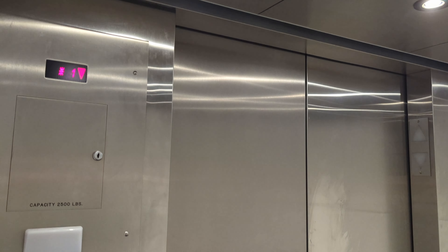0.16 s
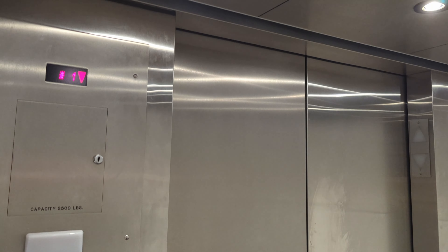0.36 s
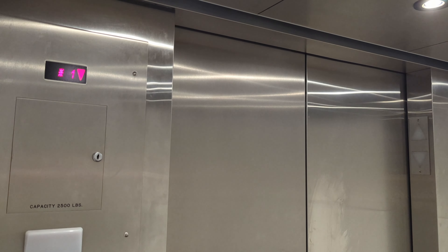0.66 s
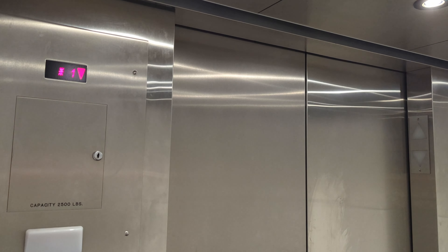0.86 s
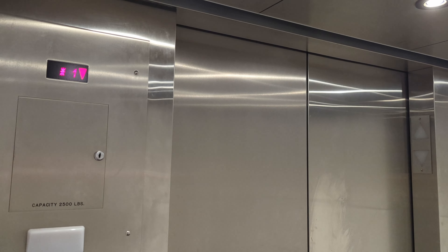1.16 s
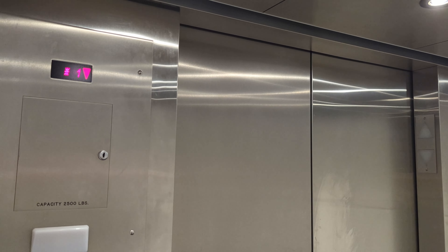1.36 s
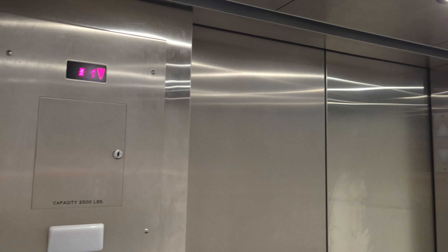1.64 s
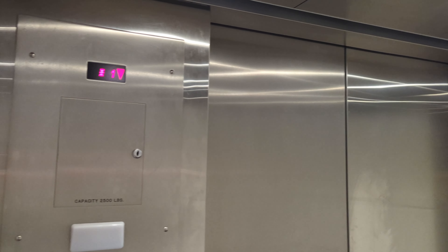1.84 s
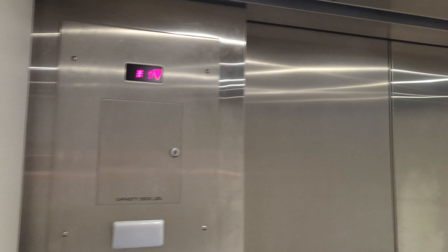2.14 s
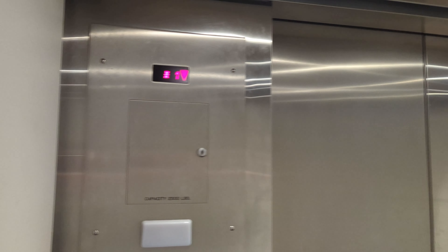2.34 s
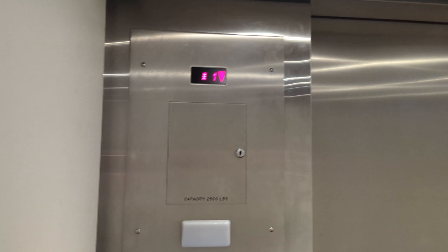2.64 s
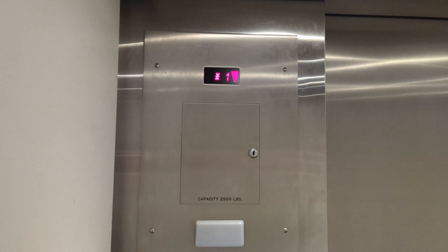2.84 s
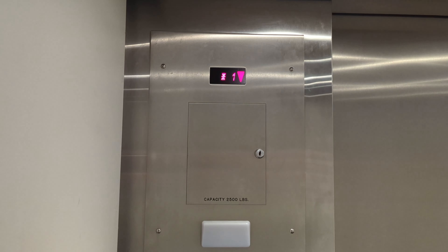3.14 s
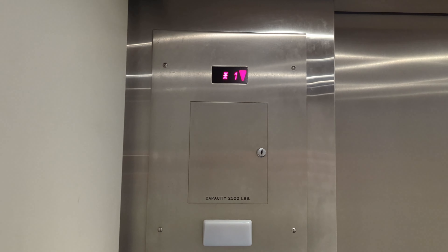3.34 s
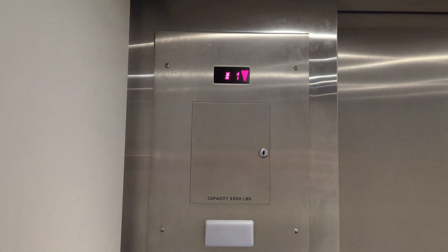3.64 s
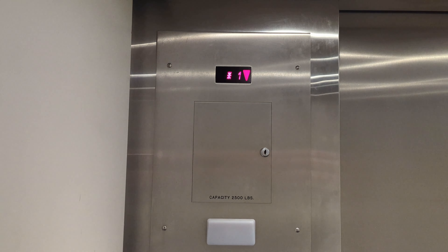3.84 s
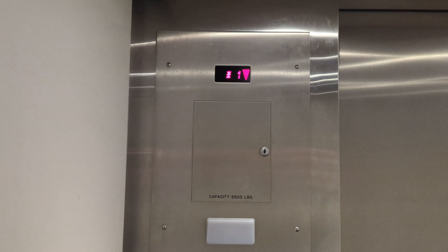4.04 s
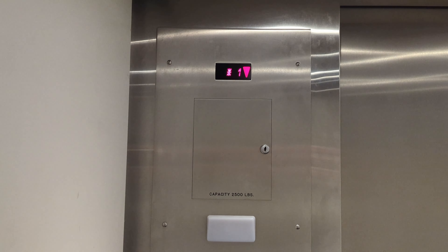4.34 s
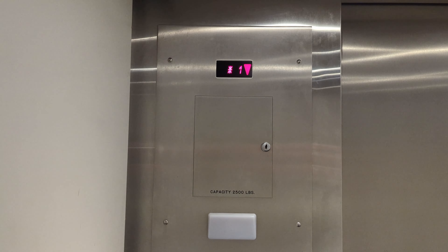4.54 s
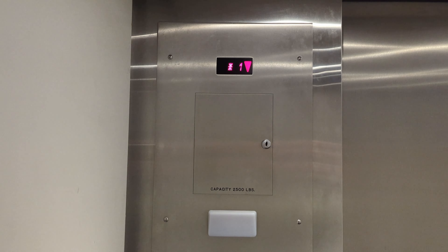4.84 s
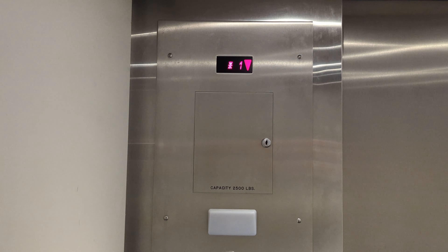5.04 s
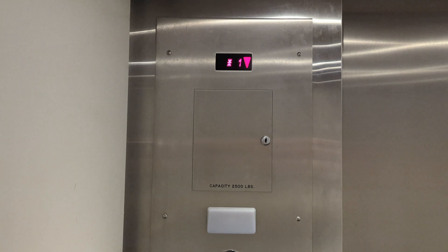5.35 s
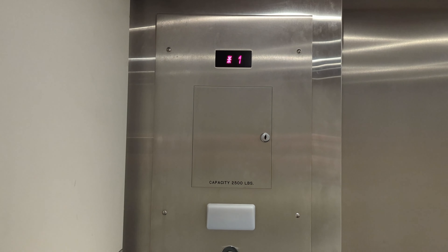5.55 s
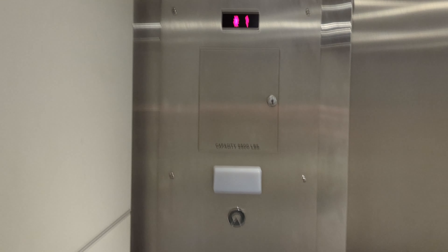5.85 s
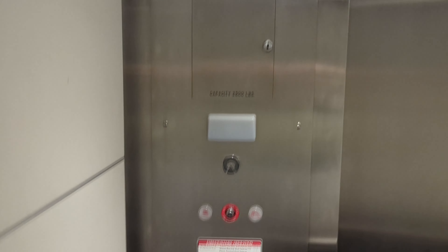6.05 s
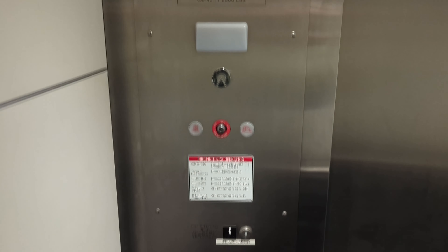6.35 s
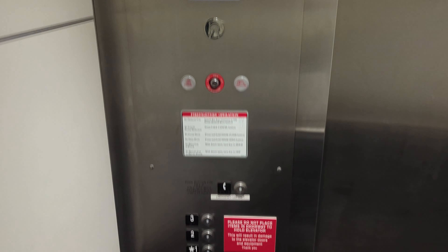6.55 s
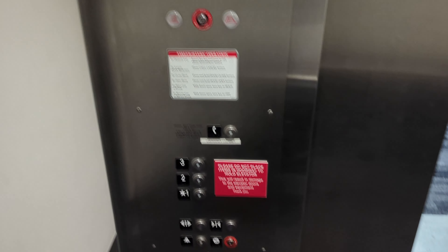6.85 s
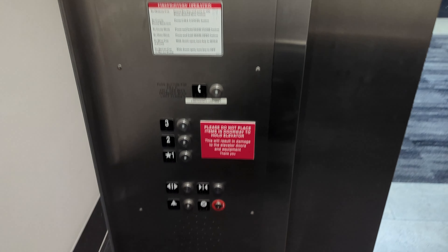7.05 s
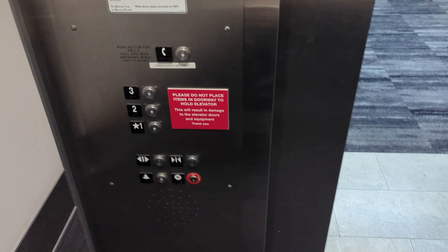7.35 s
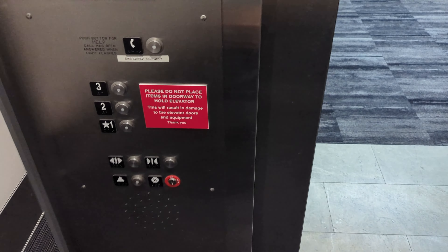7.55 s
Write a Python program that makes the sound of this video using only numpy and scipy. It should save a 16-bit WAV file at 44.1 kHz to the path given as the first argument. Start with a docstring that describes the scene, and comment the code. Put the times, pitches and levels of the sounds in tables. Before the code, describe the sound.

Close inside a steel elevator car, a valve hum dies within the first second over faint bass hum. A dull click starts a rapid, low juddering with buzzing trim that lasts several seconds. The car jolts to a stop, the lock knocks, then doors clatter loose with piercing squeaks and slide open with a groaning rumble. Stereo, short metallic reflections.

```python
"""Inside a steel lift car on a hydraulic ram: it settles, creeps down with a stick-slip judder of its
guides and jolts to a stop; the lock knocks, rollers squeak and the doors slide open over hum and faint air.
Friction, rolling and air are filtered noise; knocks and slips strike damped modes of gear and panels.
Squeaks, drones, valve and swings are fluttering tones; dense wall reflections follow the sharper sounds."""
import sys
import numpy as np
from scipy import signal
from scipy.io import wavfile
from scipy.ndimage import uniform_filter1d

SR = 44100
rng = np.random.default_rng(int(sys.argv[2]) if len(sys.argv) > 2 else 0)


def unload_audio(sound):
    """Save the sound as a 16-bit wav file, at the path given as the first command line argument."""
    columns = np.transpose(np.atleast_2d(sound))
    # keep every value between -1 and 1, then stretch to whole-number steps
    steps = np.round(np.clip(columns, -1, 1) * 32767)
    wavfile.write(sys.argv[1], SR, steps.astype(np.int16))


N = 339614
LEFT_RIGHT = np.array([[1], [-1]])  # sign of the side signal at each ear


def amp(db):
    """Level law: 20 dB is a factor of ten in amplitude."""
    return 10 ** (np.asarray(db) / 20)


def rms_one(x):
    """Normalisation to unit root-mean-square."""
    return x / np.sqrt(np.mean(x ** 2) + 1e-20)


def at_hz(points, hz):
    """Spectrum level in dB, linear in log frequency, with practically nothing outside its ends."""
    f, db = np.transpose(points)
    return np.interp(np.log(hz), np.log(f), db, left=-150, right=-150)


# Stereo width of the field. Each row: frequency in Hz, side minus mid in dB before a source's own offset.
STEREO_WIDTH = [(60, -20.5), (110, -24), (200, -11.5), (380, -7.5), (700, -2.5), (1290, 3), (2380, -0.5),
                (4400, 1), (8120, 0.5), (15000, -0.5)]


def side_gain(hz, offset_db=0):
    """Mid-side stereo: the side-to-mid ratio sets how far the two ears differ."""
    return amp(at_hz(STEREO_WIDTH, hz) + offset_db)


def drift(rate, size=None):
    """Random modulation of spread 1: noise twice through a one-pole low-pass with its corner at rate Hz."""
    size = size or N
    r = np.exp(-16 * np.pi * rate / SR)  # pole at an eighth of the sample rate
    noise = rng.standard_normal(size // 8 + 4002)
    slow = signal.lfilter([1], [1, -2 * r, r * r], noise)[4000:]  # the filter has settled
    spread = np.sqrt((1 + r * r) / (1 - r * r) ** 3)
    return np.interp(np.arange(size) / 8, np.arange(len(slow)), slow / spread)


def flutter(rate, size):
    """Complex modulation: chance in level and phase at once."""
    return drift(rate, size) + 1j * drift(rate, size)


def resonance(x, hz, width_hz):
    """Second-order resonance: a pole pair whose radius sets the bandwidth."""
    r = np.exp(-np.pi * width_hz / SR)
    return signal.lfilter([1, 0, -1], [1, -2 * r * np.cos(2 * np.pi * hz / SR), r * r], x)


def dying(s, db, t60, rise_s):
    """Exponential decay of one blow after a short rise, ended 60 dB down."""
    out, i = np.zeros(N), int(s * SR)
    t = np.arange(min(N - i, int(t60 * SR))) / SR
    out[i:i + len(t)] = amp(db - 60 * t / t60) * (1 - np.exp(-t / rise_s))
    return out


def coloured(layers, patchy_db):
    """Power addition of incoherent noise: (envelope, spectrum) layers share third-octave bands."""
    edges = 22 * 2 ** (np.arange(30) / 3)
    centres = np.minimum(np.sqrt(edges[1:] * edges[:-1]), 15000)
    gains = np.array([amp(at_hz(spectrum, centres)) * np.sqrt(centres) for _, spectrum in layers])
    powers = np.array([(env[::16] / np.linalg.norm(g)) ** 2 for (env, _), g in zip(layers, gains)])
    white, out = rng.standard_normal((2, 2, N)), np.zeros((2, N))
    for k, hz in enumerate(centres):
        band = signal.butter(2, edges[k:k + 2], "band", fs=SR, output="sos")
        mid, side = rms_one(signal.sosfilt(band, white[k % 2]))  # neighbouring bands use different noise
        level = np.sqrt(gains[:, k] ** 2 @ powers)
        level = np.interp(np.arange(N) / 16, np.arange(len(level)), level)
        level = level * amp(patchy_db * drift(8))
        out += level * (mid + side_gain(np.clip(hz, 61, 14000)) * side * LEFT_RIGHT)
    return out


def tones(rows, flutter_per_s, side_db):
    """Self-sustained oscillation of rubbed or driven steel: the rougher the contact, the faster the flutter."""
    out = np.zeros((2, N))
    for start, loudest, end, hz, db, rough, pan_db, glide_hz in rows:
        span = np.arange(max(int(start * SR), 0), min(int(end * SR), N))
        t = span / SR
        triangle = np.interp(t, [start, loudest, end], [0, 1, 0])
        swell = np.minimum(1.43 * triangle, 1) ** 1.15  # too tall a triangle, cut flat
        pitch = np.interp(t, [start, end], [hz, hz + glide_hz])
        carrier = np.exp(2j * np.pi * (np.cumsum(pitch) / SR + rng.random()))
        rate = flutter_per_s * rough ** 2
        mid, side = [(1 + rough * flutter(rate, len(t)) + 0.12 * flutter(0.045 * hz, len(t))) * carrier
                     for _ in range(2)]
        width = side_gain(np.clip(hz, 61, 14000), side_db)
        pair = (mid.real + width * side.imag * LEFT_RIGHT) * amp(pan_db / 2 * LEFT_RIGHT)
        out[:, span] += amp(db) * swell * np.sqrt(2 / (1 + 2 * rough ** 2)) * pair
    return out


def strike(times, db, hz, t60, spread_db):
    """Impulse response of one mode: uneven blows, whose soft contact excites nothing far above it."""
    clicks = np.zeros((2, N)) + 1e-18
    uneven = spread_db * rng.standard_normal((len(times), 2)).T
    clicks[:, (np.array(times) * SR).astype(int)] = amp(db + uneven)
    r, w = amp(-60 / (t60 * SR)), 2 * np.pi * hz / SR
    rung = signal.lfilter([0, np.sin(w)], [1, -2 * r * np.cos(w), r * r], clicks)
    mid, side = signal.sosfilt(signal.butter(2, 1.61 * hz, fs=SR, output="sos"), rung)
    late_side = np.roll(side, int(SR / hz / 4))  # a quarter cycle apart
    return mid + side_gain(hz, -10.0) * late_side * LEFT_RIGHT


# Faint air noise. Each row: frequency in Hz, relative spectral density in dB per Hz.
AIR_SPECTRUM = [(22, -2), (50, -7.5), (91, 1), (123, -0.5), (160, -19.5), (247, -14), (320, -20),
                (400, -27.5), (554, -30), (650, -24), (800, -35), (1500, -46), (4060, -53.5), (9000, -53.5),
                (15600, -58.5)]


def air():
    """Stationary broadband noise: a constant level with a bass-heavy spectrum."""
    return np.full(N, amp(-51)), AIR_SPECTRUM


# Lines of the electrical hum. Each row: frequency in Hz, mean level in dB rms.
HUM_LINES = [(118.4, -48), (236.8, -69.5), (296, -74)]


def hum():
    """Line spectrum of the electrical gear: steady sines that waver a little in level and phase."""
    t = np.arange(N) / SR
    waver_db = .8 * drift(2)
    return sum(amp(db + waver_db) * np.sqrt(2) * np.sin(2 * np.pi * hz * t + 0.12 * drift(0.5))
               for hz, db in HUM_LINES)


# Hum of the oil valve. Each row: frequency in Hz, relative level in dB, roughness as a share.
VALVE_LINES = [(415, -49, 0.74), (453, -56, 1.04), (627, -55.5, 1.1), (769, -59, 2.7), (1070, -63, 1.2),
               (1562, -69, 0.64)]


def valve():
    """Flow-excited tones: the oil valve hums on several pitches and dies as the car settles."""
    crest_s, end_s = 0.13, 0.63
    rows = [(-.6, crest_s, end_s, *line, 0, 0) for line in VALVE_LINES]
    return tones(rows, flutter_per_s=43.4, side_db=-1.5)


# Movements of the steelwork, one list each: settling, a bump, the jolt to a stop, the lock,
# the doors breaking loose, the doors sliding.
# Each row: time in seconds, relative rumble level in dB, relative roll level in dB.
MOVEMENTS = [
    [(0.0, -29.5, -61), (.06, -40.5, -62), (.075, -42, -61), (.2, -36.5, -56), (.27, -39, -63),
     (.31, -41.5, -56.5), (.38, -35, -57.5), (.45, -45.5, -62.5), (.6, -64, -100)],
    [(2.285, -40, -71), (2.325, -41, -59), (2.43, -41, -69), (2.55, -43, -72)],
    [(5.2, -39, -99), (5.25, -38, -62), (5.265, -40, -52.5), (5.37, -33, -56.5), (5.41, -51, -60),
     (5.5, -39.5, -66.5)],
    [(5.56, -32.5, -59), (5.59, -32, -48.5), (5.68, -35, -56.5), (5.71, -37.5, -63.5), (5.81, -32.5, -56),
     (5.93, -37, -67.5), (6.07, -39.5, -63.5)],
    [(6.14, -30, -57), (6.17, -39, -58.5), (6.21, -33.5, -59), (6.24, -31, -46.5), (6.29, -31, -46),
     (6.39, -32, -47), (6.43, -28, -45), (6.5, -30.5, -45), (6.59, -43, -45), (6.69, -34.5, -54.5)],
    [(6.75, -35, -55), (6.86, -37, -59.5), (6.93, -39.5, -62), (7.16, -39.5, -56), (7.43, -37.5, -57),
     (7.5, -42, -61), (7.53, -35.5, -52.5), (7.7, -45, -56)],
]


def moving():
    """Amplitude envelopes of rumble and roll, fading to silence outside each movement."""
    t, out = np.arange(N) / SR, np.zeros((2, N))
    for rows in map(np.array, MOVEMENTS):
        corners = rows[[0, 0, -1, -1], 0] + [-.04, 0, 0, .05]
        fade = np.interp(t, corners, [0, 1, 1, 0])
        out += fade * np.array([np.interp(t, rows[:, 0], amp(db)) for db in rows.T[1:]])
    return out


# Noise of moving steelwork, low and higher. Each row: frequency in Hz, relative density in dB per Hz.
RUMBLE_SPECTRUM = [(13, -40), (22, 1.5), (91, 4), (124, -2.5), (178, -1), (219, -22.5), (345, -12),
                   (600, -25), (780, -83), (1320, -120)]
ROLL_SPECTRUM = [(180, -0.5), (300, 3.5), (367, -0.5), (477, -6.5), (778, -8.5), (1440, -9), (3920, -26),
                 (6000, -44), (7800, -77), (13200, -120)]


def motion_noise(rumble, roll):
    """Rolling noise: moving steelwork excites a low rumble and a brighter roll."""
    return [(amp(-5.0) * rumble, RUMBLE_SPECTRUM), (amp(4.5) * roll, ROLL_SPECTRUM)]


# Panels of the car. Each row: frequency in Hz, decay time T60 in seconds,
# then gains in dB for a slip, for a knock and under motion.
PANEL_MODES = [(36.2, 0.43, -12, -16, -8), (90.8, 0.19, -6, -32, -6), (117.2, 0.22, 7, -11, -15),
               (167.2, 0.16, -13, -14, -18), (183.8, 0.14, -2.5, -13, -20),
               (260.3, 0.13, -17.5, -8.5, -25.5), (1258, 0.099, -21.5, -29, -44),
               (1840, 0.15, -29.5, -43, -66), (2080, 0.1, -37.5, -47, -65)]


def panels(rumble):
    """Forced and free vibration of plates: slips and knocks strike them, motion shakes them all along."""
    slips, blows, out = np.array(GUIDE_SLIPS), np.array(GEAR_KNOCKS), np.zeros((2, N))
    for hz, t60, slip_db, knock_db, motion_db in PANEL_MODES:
        out += strike(slips[:, 0], slips[:, 1] + slip_db, hz, t60, spread_db=-0.5)
        out += strike(blows[:, 0], blows[:, 3] + knock_db, hz, t60, spread_db=5.0)
        width_hz = 3.4 / t60
        band = resonance(resonance(rng.standard_normal(N), hz, width_hz), hz, width_hz)
        out += amp(motion_db) * rumble * rms_one(band)
    return out


# Low swings of the car body. Each row: start, loudest moment and end in seconds, frequency in Hz,
# relative level in dB.
BODY_SWINGS = [(.01, 0.052, .1, 89, -34.5), (0.073, 0.136, .2, 116, -39), (0.299, 0.36, .44, 119.8, -42),
               (5.295, 5.368, 5.5, 34.2, -35.5), (5.322, 5.35, 5.42, 75, -33),
               (5.598, 5.648, 5.76, 87, -34), (6.26, 6.28, 6.335, 165, -33),
               (6.326, 6.363, 6.41, 86.5, -22.5), (6.408, 6.43, 6.5, 179, -28),
               (6.792, 6.857, 6.92, 89.3, -38), (7.33, 7.373, 7.44, 146.4, -41.5),
               (7.519, 7.539, 7.57, 268, -39), (7.535, 7.564, 7.62, 95, -45.5)]


def swings():
    """Low-order vibration of the car body: brief, slightly rough tones."""
    rough = 0.28
    return tones([(*row, rough, 0, 0) for row in BODY_SWINGS], flutter_per_s=104, side_db=-3.0)


# Bright scuffs of steel on steel. Each row: start and length in seconds, relative scrape level in dB,
# relative sizzle level in dB.
STEEL_SCUFFS = [(0.062, 0.026, -80, -85), (0.12, 0.076, -73, -76), (0.283, 0.15, -74, -77),
                (5.262, 0.01, -63, -69), (5.572, 0.008, -71, -71), (5.609, 0.018, -66.5, -64.5),
                (6.16, .05, -79, -81), (6.222, 0.05, -57, -66), (6.359, 0.048, -56.5, -54.5),
                (6.4, 0.03, -53, -61), (6.503, 0.025, -60, -61), (6.523, 0.12, -51.5, -58.5),
                (6.736, 0.033, -61, -69), (6.647, 0.84, -64.5, -77), (7.07, 0.35, -69.5, -70.5),
                (7.508, 0.014, -86, -72), (7.579, 0.03, -65.5, -72.5)]
# Noise of scrape and sizzle. Each row: frequency in Hz, relative density in dB per Hz.
SCRAPE_SPECTRUM = [(1760, -1.5), (3000, 2), (3970, -4), (4840, 4), (6170, -4), (9000, -3.5), (11700, -45),
                   (19800, -120)]
SIZZLE_SPECTRUM = [(5290, -36), (9000, 3), (11100, -16), (13900, 2.5), (15600, -33)]


def scuffs(roll):
    """Sliding friction noise: each scuff rises, holds and dies away; rolling always scrapes a little."""
    rise_share, t60_s = 0.12, 0.28
    t, power = np.arange(N) / SR, np.zeros((2, N))
    for s, length, *db in STEEL_SCUFFS:
        rise = np.clip((t - s) / (rise_share * length), 0, 1)
        fall = amp(-60 * np.clip(t - s - length, 0, 1) / t60_s)
        power += np.outer(amp(db), rise * fall) ** 2
    scrape, sizzle = np.sqrt(power)
    scrape = np.hypot(scrape, amp(-23.5) * roll)
    return [(amp(5.0) * scrape, SCRAPE_SPECTRUM), (amp(6.5) * sizzle, SIZZLE_SPECTRUM)]


# Knocks of lock and door gear. Each row: time in seconds, relative level in dB, relative treble tilt
# in dB per octave, relative thump in dB, favoured pitch in Hz.
GEAR_KNOCKS = [(0.07, -48, 0, -63.5, 2000), (1.437, -48.5, -4.5, -63, 1280), (1.472, -57.5, -10, -58, 1270),
               (2.301, -48, -10, -50, 800), (2.313, -63, -7, -44, 1850), (5.244, -50, -3, -55, 1300),
               (5.2653, -38.5, -2, -52, 1400), (5.545, -54, -1, -50, 1400),
               (5.5813, -34.5, -4.5, -47, 1503), (5.593, -41, -6, -48, 1550), (5.629, -40, -5.5, -31, 1400),
               (5.754, -68, 5, -36, 1400), (6.118, -49, -13, -28.5, 900), (6.151, -45.5, -1.5, -52, 1400),
               (6.2371, -29, 0, -41, 940), (6.251, -35, -3, -45, 1600), (6.3639, -36.5, -2, -26.5, 950),
               (6.406, -31.5, 2, -27.5, 1500), (6.424, -30, 0.5, -29, 1820), (6.441, -46, 0, -32, 1900),
               (6.527, -38, -1, -47, 1250), (6.575, -43, -7, -47, 1500), (7.165, -46, 0, -57, 1500),
               (6.753, -53, -12, -58, 1400), (7.28, -50, -5, -55, 1400), (7.513, -35.5, -6, -30, 1090)]
# Noise of a knock before its tilt. Each row: frequency in Hz, relative density in dB per Hz.
KNOCK_SPECTRUM = [(120, -40), (200, 14), (258, -4), (321, -28), (744, -10), (1850, -8.5), (3140, -23.5),
                  (12300, -50.5), (15600, -67)]


def knocks():
    """Impact noise: a dying burst whose spectrum is tilted by how hard the contact is."""
    layers = []
    for s, db, tilt, *_ in GEAR_KNOCKS:
        spectrum = [(f, d + (tilt + 4) * np.log2(f / 1500)) for f, d in KNOCK_SPECTRUM]
        layers.append((dying(s, db - 5.0, 0.29, 0.002), spectrum))
    return layers


# Modes of lock and door gear. Each row: frequency in Hz, relative level in dB, decay time T60 in seconds.
GEAR_MODES = [(488, 0, 0.13), (814, -12, 0.051), (959, -8.5, 0.057), (1094, -11.5, 0.044),
              (1208, -10.5, 0.11), (1326, -9, 0.085), (1490, -5.5, 0.038), (1649, -11, 0.083),
              (1824, -15, 0.08), (1970, -19, 0.066), (2190, -19, .07), (2594, -15, 0.098),
              (3100, -25, 0.091)]
# Clatter of each knock. Each row: nominal delay in seconds, level against the knock in dB.
REBOUNDS = [(0, 0), (.006, -4), (.013, -1), (0.021, -7), (.033, -8)]


def gear():
    """Modal ringing: knocks and rebounds excite most the modes near the pitch that each favours."""
    scatter, off_pitch_db = .2, 9.5  # share by which a delay varies; loss in dB per octave
    blows = [(row[0] + later * (1 + scatter * rng.uniform(-1.01, 1)), row[1] + less_db, row[4])
             for row in GEAR_KNOCKS for later, less_db in REBOUNDS]
    s, blow_db, near_hz = np.transpose(blows)
    out = np.zeros((2, N))
    for hz, db, t60 in GEAR_MODES:
        loss_db = off_pitch_db * np.abs(np.log2(hz / near_hz))
        out += strike(s, blow_db + db - 2.5 - loss_db, hz, t60, spread_db=2.5)
    return out


def car_walls(x):
    """Reverberation: dense reflections between steel walls, as dying noise of its own at each ear."""
    t60_s, echo_db = .2, -8
    t = np.arange(int(t60_s * SR)) / SR
    echo = rng.standard_normal((2, len(t))) * amp(-60 * t / t60_s) * (t > .003)
    echo /= np.linalg.norm(echo[0])
    return x + amp(echo_db) * signal.fftconvolve(x, echo, axes=1)[:, :N]


# Drones and faint whistles of ram and door drive. Each row: start, nominal crest and end in seconds
# (two crests lie outside their span), frequency in Hz, relative level in dB, roughness as a share.
DRIVE_DRONES = [(0.499, 1.2, 1.3, 612, -67.5, 0.3), (1.101, 1.3, 1.6, 655, -72.5, 0.43),
                (1.788, 1.83, 2.23, 2430, -75.5, 1.2), (1.8, 1.95, 2.17, 3220, -85, 1.4),
                (2.38, 2.48, 2.6, 3360, -84, .8), (2.39, 2.415, 2.44, 4260, -84, .5),
                (1.6, 4.74, 5.35, 2834, -86, 1.07), (1.401, 6.6, 5.8, 408.4, -63, 0.4),
                (5.202, 5.275, 5.47, 460, -54.5, 0.64), (5.599, 5.68, 5.78, 477, -50.5, 0.55),
                (6.067, 6.13, 6.28, 480, -51.5, 0.98), (6.13, 6.16, 6.22, 2700, -55, 3),
                (5.7, 5.9, 6.25, 178, -47.5, 0.92), (6.55, 6.75, 7.05, 110, -53, 0.62),
                (6.958, 7.09, 7.5, 91.65, -37.5, 0.36), (6.721, 5.3, 7.6, 258.6, -52.5, 0.5),
                (6.78, 6.996, 7.09, 344.5, -48.5, 0.32), (7.05, 7.15, 7.58, 361.4, -54, 0.55),
                (7.51, 7.638, 8.0, 301.3, -47.5, 0.7)]


def drones():
    """Driven oscillation: ram and door drive sound steady pitches with a rough flutter."""
    return tones([(*row, 0, 0) for row in DRIVE_DRONES], flutter_per_s=43.4, side_db=-1.5)


# Slips of the guides while the car creeps. Each row: time in seconds, relative strength in dB.
GUIDE_SLIPS = [(1.44, -42.5), (1.554, -51), (1.612, -48), (1.683, -46), (1.75, -45.5), (1.81, -47),
               (1.872, -44), (1.937, -45), (2.007, -43), (2.102, -45), (2.16, -53), (2.289, -47),
               (2.355, -48), (2.452, -48), (2.544, -46), (2.615, -44), (2.687, -43), (2.751, -44),
               (2.812, -45.5), (2.876, -45), (2.936, -46), (3.002, -43.5), (3.068, -45.5), (3.151, -45.5),
               (3.235, -47), (3.324, -46.5), (3.418, -46.5), (3.521, -44.5), (3.618, -44.5), (3.702, -45),
               (3.78, -46.5), (3.842, -44.5), (3.907, -45), (3.968, -48.5), (4.022, -45.5), (4.082, -48.5),
               (4.134, -48.5), (4.193, -48.5), (4.253, -45.5), (4.308, -46.5), (4.365, -50.5),
               (4.435, -47.5), (4.516, -46.5), (4.599, -46.5), (4.672, -47), (4.746, -48), (4.821, -47),
               (4.889, -45.5), (4.951, -48.5), (5.012, -48.5), (5.05, -48.5), (5.115, -47), (5.165, -51),
               (5.223, -46)]


def slip_rasp():
    """Stick-slip friction: every slip releases a dying rasp of uneven strength; their powers add."""
    uneven_db = -13.5 + 1 * rng.standard_normal(len(GUIDE_SLIPS))
    power = sum(dying(s, db + own_db, 0.45, 0.003) ** 2
                for (s, db), own_db in zip(GUIDE_SLIPS, uneven_db))
    return np.sqrt(power)


# Noise of the judder. Each row: frequency in Hz, relative density in dB per Hz.
JUDDER_SPECTRUM = [(25, -26), (45, -27.5), (104, 0), (290, -23), (409, -15), (551, -30.5), (627, -31),
                   (1030, -35.5), (1270, -37.5), (1510, -42), (2400, -50.5), (5000, -60.5), (6500, -81)]


def judder(rasp):
    """Friction-induced noise: the rasp of the slips, strongest near 100 Hz."""
    return amp(14.5) * rasp, JUDDER_SPECTRUM


# Loose trim. Each row: frequency in Hz, bandwidth of each of two resonances in Hz, relative level in dB.
TRIM_BANDS = [(648, 80, 6), (878, 76, 6), (1187, 81, 4.5), (1287, 87, 5), (1607, 45, -5.5),
              (1808, 33, -6.5), (2124, 60, -12.5)]


def rattle(rasp):
    """Contact vibration: slips shake loose trim, which buzzes in narrow bands and on between slips."""
    memory = int(0.18 * SR)
    recent = uniform_filter1d(rasp, memory, origin=int(0.18 * SR / 2) - 1)  # mean over the past
    shaken = np.hypot(rasp, amp(-5) * recent)
    out = np.zeros((2, N))
    for hz, width_hz, db in TRIM_BANDS:
        noise = rng.standard_normal((2, N))
        out += amp(db) * shaken * rms_one(resonance(resonance(noise, hz, width_hz), hz, width_hz))
    return amp(-19.5) * out


# Wall that sings while a guide slides. Each row: nominal frequency in Hz, level against the slip in dB.
WALL_PITCHES = [(408, -3), (445, -6.5)]


def slides():
    """Beating: after each slip the wall swells on two close pitches until the guide grips or slips again."""
    slide_s, in_step_s, overlap_s = 0.071, 0.01595, .006  # longest slide; pitches in step; past next slip
    out, starts = np.zeros((2, N)), np.array(GUIDE_SLIPS)[:, 0]
    lengths = np.minimum(np.diff(starts, append=starts[-1] + slide_s) + overlap_s, slide_s)
    chances = rng.standard_normal((len(GUIDE_SLIPS), 3))
    for (s, db), length, chance in zip(GUIDE_SLIPS, lengths, chances):
        t, i = np.arange(int(length * SR)) / SR, int(s * SR)
        swell = np.sin(np.pi * (t / length) ** 1.24) ** 0.75
        for (hz, sing_db), own in zip(WALL_PITCHES, chance[1:]):
            phase = 2 * np.pi * hz * (1 + 0.0044 * own) * (t - in_step_s) + 3 * chance[0]
            out[:, i:i + len(t)] += amp(db + sing_db) * swell * np.sin(phase + 0.22 * LEFT_RIGHT)
    return out


# Dry ticks. Each row: time in seconds, relative level in dB.
DRY_TICKS = [(3.8176, -58), (5.6807, -42), (5.986, -51)]


def ticks():
    """Short impact: a very brief burst of noise with the bass filtered off."""
    burst = sum(dying(s, db, 0.013, 0.00024) for s, db in DRY_TICKS) * rng.standard_normal((2, N))
    return signal.sosfilt(signal.butter(2, 2500, "high", fs=SR, output="sos"), burst)


# Squeaks of rollers and guides. Each row: start, loudest moment and end in seconds, frequency in Hz,
# relative level in dB, roughness as a share, left minus right in dB, glide in Hz.
STEEL_SQUEAKS = [(5.58, 5.59, 5.63, 2700, -58, .7, 4, -90), (6.09, 6.105, 6.14, 14300, -77, 0.99, 2, 0.1),
                 (6.152, 6.165, 6.32, 13800, -58, 1.1, -3, -100),
                 (6.298, 6.305, 6.316, 8500, -30, 0.84, 9, 38),
                 (6.312, 6.318, 6.33, 8580, -30.5, 0.58, 1, 2),
                 (6.324, 6.334, 6.352, 8480, -34.5, 0.87, -2, 151),
                 (6.355, 6.37, 6.41, 8580, -46, 0.8, -3, -4), (6.285, 6.32, 6.39, 9400, -45, 2.8, 5, 5),
                 (6.29, 6.302, 6.316, 10590, -43, 0.484, -1, -2),
                 (6.305, 6.322, 6.342, 10590, -35.5, 0.44, -2, -130),
                 (6.335, 6.348, 6.366, 10400, -39, 0.93, -2, -40),
                 (6.365, 6.375, 6.39, 8700, -51, 0.72, 1, 4), (6.355, 6.37, 6.41, 10400, -55, .8, -2, 0.1),
                 (6.365, 6.385, 6.4, 9800, -51, 1.1, -4, 0.1),
                 (6.362, 6.37, 6.39, 7120, -45.5, 0.98, -1, 0.1),
                 (6.39, 6.41, 6.5, 5030, -54, 0.55, 4, -10),
                 (6.515, 6.553, 6.575, 5011, -37.5, 0.3, 1.5, -12),
                 (6.555, 6.6, 6.638, 5011, -30.5, 0.25, 2.5, 0.1),
                 (6.645, 6.68, 6.77, 5015, -55.5, 0.56, -9, 0.1),
                 (6.525, 6.548, 6.575, 4490, -46, 0.62, -6, 30), (6.57, 6.6, 6.65, 4640, -47, 0.86, 5, -60),
                 (6.56, 6.59, 6.63, 4060, -61, 0.71, 7, 0.1), (6.54, 6.57, 6.67, 5490, -48.5, 0.53, 3, -66),
                 (6.535, 6.565, 6.66, 9530, -47.5, 2.4, 0, 3), (6.745, 6.76, 6.82, 4800, -48.5, 2.2, 3, 6),
                 (7.005, 7.03, 7.075, 3390, -56, 0.73, 8, 7), (7.0, 7.045, 7.07, 2230, -59, 0.5, 3, 63),
                 (7.07, 7.125, 7.15, 2010, -59.5, 0.6, 6, 59),
                 (6.96, 7.055, 7.125, 1016, -40, 0.31, 7.5, 15),
                 (7.08, 7.115, 7.215, 1030, -50.5, 0.41, 10, -19),
                 (6.98, 7.0, 7.035, 1200, -51, 0.44, -2, -80),
                 (7.02, 7.068, 7.11, 1130, -46, 0.35, -6.5, 20),
                 (7.11, 7.16, 7.21, 1150, -52, 0.73, -3, -14)]


def squeaks():
    """Friction-driven oscillation: high squeaks are single lines, low ones groan with rougher harmonics."""
    groan_below_hz, overtones_db = 2000, [-21.5, -28]  # second and third harmonic
    groans = [row for row in STEEL_SQUEAKS if row[3] < groan_below_hz]
    shrill = [row for row in STEEL_SQUEAKS if row[3] >= groan_below_hz]
    overtones = [(*when, hz * k, db + less_db, .7, pan_db, glide_hz * k)
                 for *when, hz, db, _, pan_db, glide_hz in groans
                 for k, less_db in enumerate(overtones_db, 2)]
    low = tones(groans + overtones, flutter_per_s=150, side_db=-3.0)
    high = tones(shrill, flutter_per_s=150, side_db=1.5)  # further out of step between the ears
    return low + high


def scene():
    """Superposition: noise layers, tones and struck modes add; the sharper sounds also excite the walls."""
    rumble, roll = moving()
    rasp = slip_rasp()
    layers = [air(), judder(rasp)] + motion_noise(rumble, roll) + scuffs(roll) + knocks()
    diffuse = coloured(layers, patchy_db=1.8) + hum() + valve() + panels(rumble) + swings()
    diffuse += drones() + rattle(rasp) + slides()
    near, echoed = squeaks(), .4  # share of the squeaks that reaches the walls
    car = diffuse + car_walls(gear() + ticks() + echoed * near) + (1 - echoed) * near
    return car * amp(-.4 * LEFT_RIGHT)  # slightly stronger on the right


def record(dry):
    """Band limitation: the microphone loses the deepest bass; the top is cut steeply."""
    dry = signal.sosfilt(signal.butter(10, 36.0, "high", fs=SR, output="sos"), dry)
    return signal.sosfilt(signal.cheby2(20, 70, 15950, fs=SR, output="sos"), dry)


dry = scene()
out = record(dry)
unload_audio(out)
```